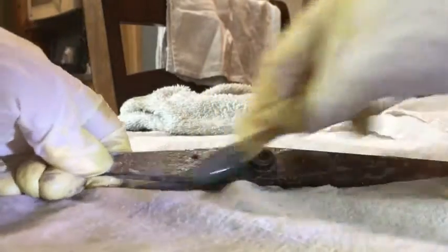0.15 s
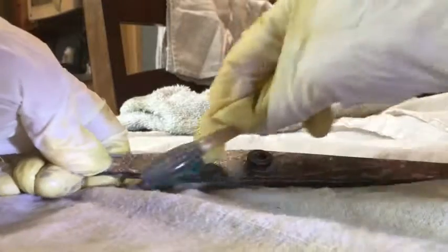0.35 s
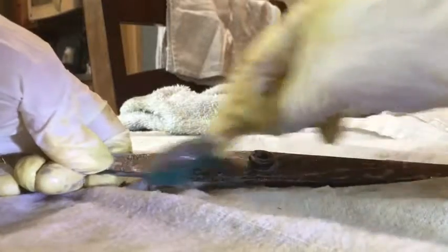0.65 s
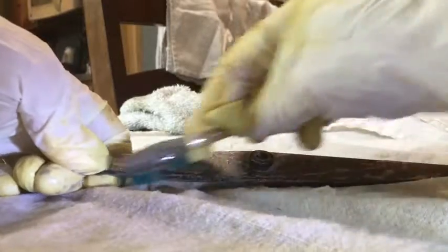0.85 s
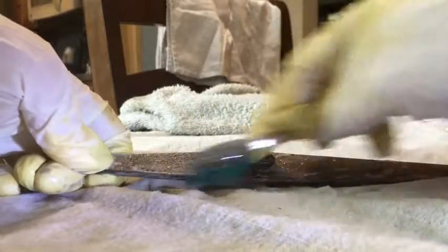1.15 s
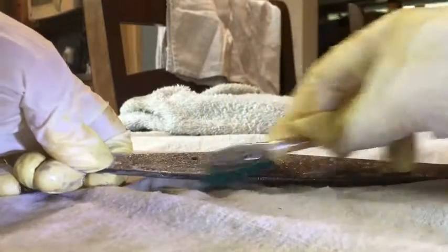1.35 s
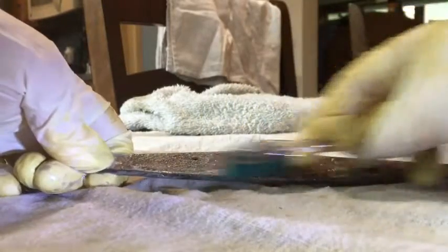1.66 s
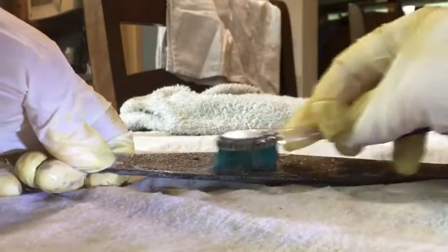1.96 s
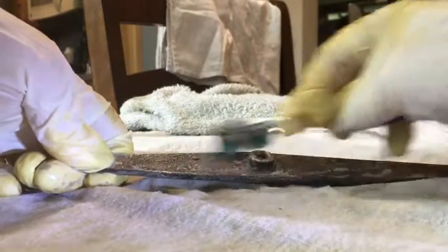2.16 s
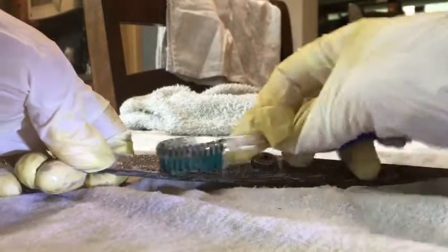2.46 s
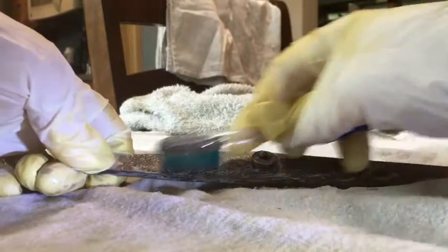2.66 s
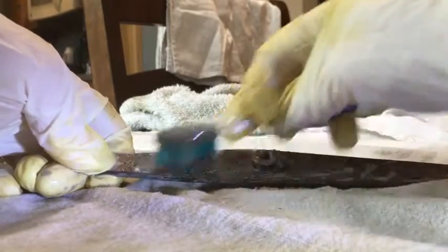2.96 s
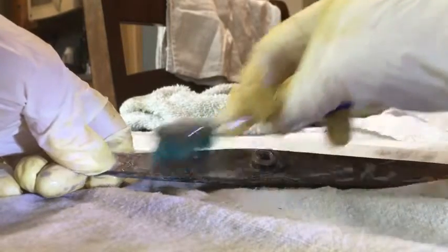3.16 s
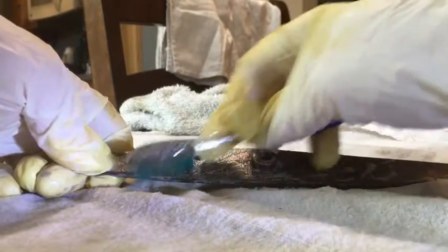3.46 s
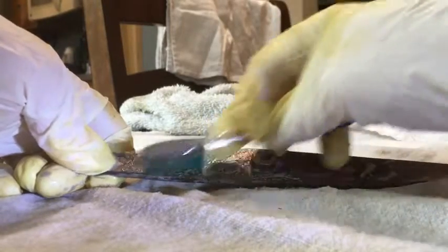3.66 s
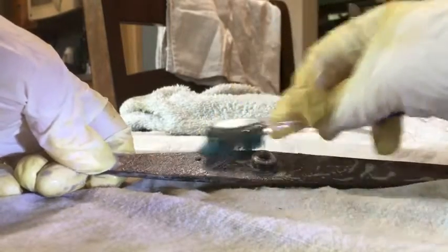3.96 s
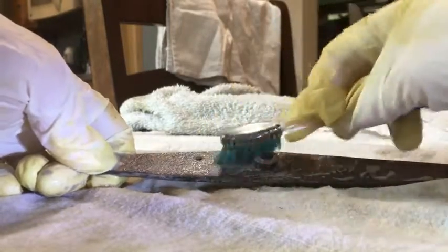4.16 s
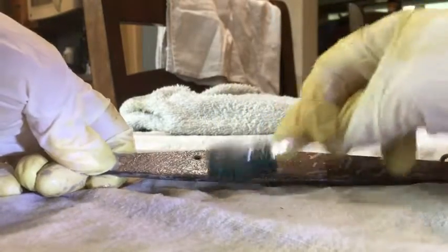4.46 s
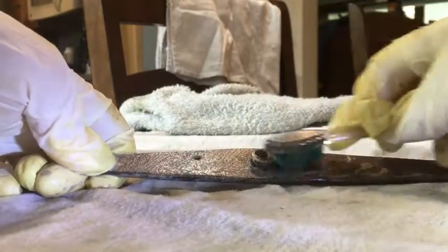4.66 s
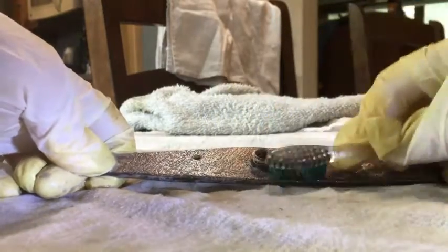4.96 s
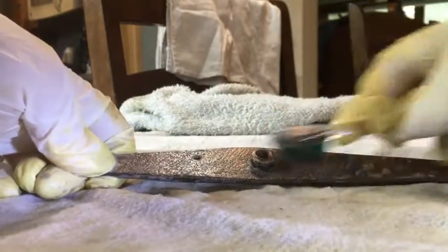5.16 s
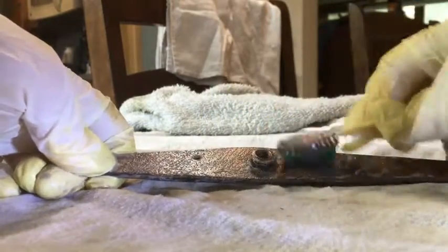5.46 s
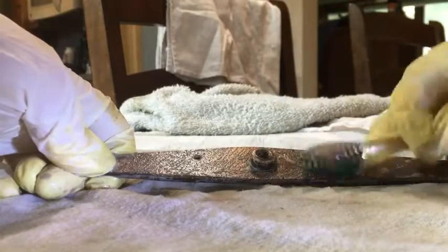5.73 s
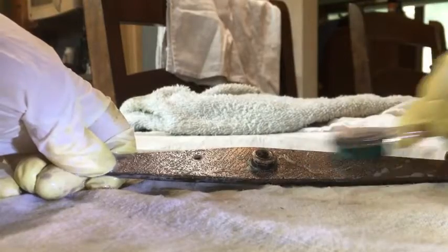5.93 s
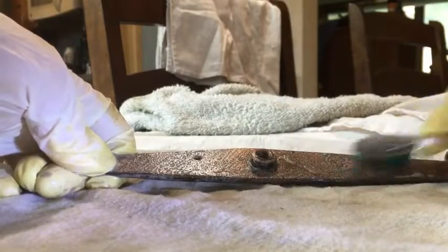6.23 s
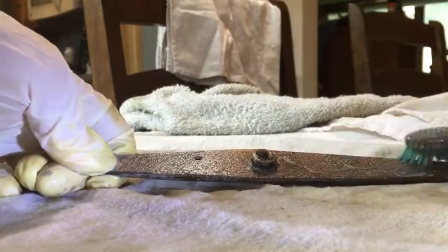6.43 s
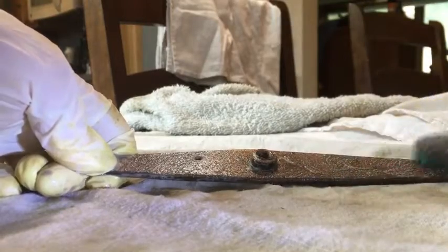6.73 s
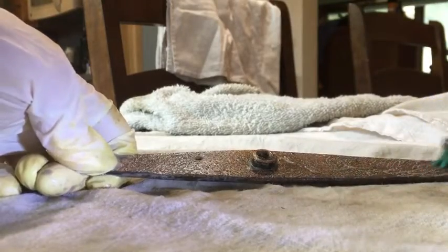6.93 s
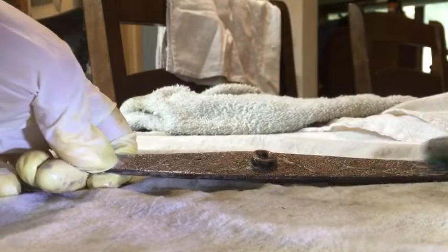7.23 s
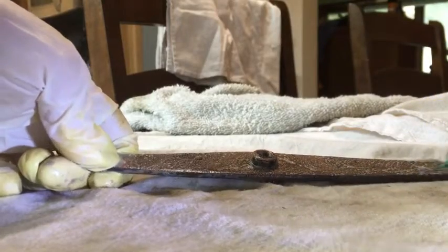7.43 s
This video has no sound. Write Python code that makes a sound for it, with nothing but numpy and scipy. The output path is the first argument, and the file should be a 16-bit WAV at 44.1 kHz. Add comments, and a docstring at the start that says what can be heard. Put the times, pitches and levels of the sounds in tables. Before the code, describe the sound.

A toothbrush scrubs a tarnished metal plate held on a towel, heard close up in mono. From the start, quick push and pull strokes, about eight a second, make a bright, grainy hiss that swells and dips with each turn. Light knocks of the plastic head and ticks of bristles come at about 0.4, 1.3 and 2.3 seconds, each with a very short, damped metallic ring. After a tiny break near 2.5 seconds, the strokes run faster, about ten a second, with small ticks around 2.9, 4.3 and 4.6 seconds. From about 4.6 seconds they become longer and more uneven, then slightly louder and fizzier from around 6 seconds. A sharp, high tick lands at 7.1 seconds, and thin, bright scrubbing continues to the end at about 7.6 seconds. Low ventilation rumble and hum stay underneath throughout.

```python
"""A room with ventilation humming behind; close to a mono microphone, a toothbrush scrubs a metal plate.
The plate is tarnished and held down on a towel. In each stroke the bristles speed up, flick over the
rough metal in thousands of tiny slips that merge into a bright hiss, and slow for the turn.
Now and then the plastic head knocks or flicking bristles tick on the plate, which rings briefly."""
import sys
import numpy as np
from scipy import signal
from scipy.fft import rfft, irfft
from scipy.io import wavfile
from scipy.ndimage import uniform_filter1d, map_coordinates

SR = 44100
rng = np.random.default_rng(int(sys.argv[2]) if len(sys.argv) > 2 else 0)


def file_out(sig):
    """Save sig as 16-bit WAV at sys.argv[1]."""
    # one column per channel
    cols = np.atleast_2d(sig).T
    # limit, then scale
    lim = np.clip(cols, -1, 1)
    pcm = np.round(lim * 32767).astype(np.int16)
    wavfile.write(sys.argv[1], SR, pcm)


N = 334710
TIME = np.arange(N) / SR

# fizz above about 10 kHz, rising as the brush works toward the far end: time_s, fizz_db
BRIGHTNESS = [(.15, 3), (.45, 1), (1.02, -0.5), (1.28, -1), (1.4, 4), (2.1, 3), (2.3, 5.5), (3.7, 5),
              (4.25, 0), (4.65, 6), (5.5, 2.5), (6, 6.5), (6.98, 9), (7.1, 15.5), (7.24, 4), (7.36, 13.5),
              (7.48, 4), (7.59, 16)]


def undb(db):
    """Decibels to gain."""
    return 10 ** (np.asarray(db) / 20)


def unit(x):
    """Scale to an rms of 1."""
    return x / np.sqrt(np.mean(x ** 2))


def curve(points, t):
    """Read an envelope of (time_s, value) points at the time t."""
    return np.interp(t, *np.transpose(points))


def gate(start_s, end_s, fade_s):
    """Open from start to end, with a linear fade centred on each."""
    return np.clip(np.minimum(TIME - start_s, end_s - TIME) / fade_s + .5, 0, 1)


def wander(rate_hz):
    """Smooth random modulation with an rms of 1."""
    hold = max(int(SR / rate_hz), 1)
    steps = np.repeat(rng.standard_normal(N // hold + 1), hold)[:N]
    return unit(uniform_filter1d(uniform_filter1d(steps, hold), hold))


def colour(x, points):
    """Equalise a sound along (frequency_hz, gain_db) points."""
    hz, db = np.transpose(points)
    bins = np.maximum(np.fft.rfftfreq(N, 1 / SR), 1)
    return irfft(rfft(x) * undb(np.interp(np.log(bins), np.log(hz), db)), N)


def resonate(x, hz, width_hz):
    """One resonance, gain 1 at its centre."""
    return signal.lfilter(*signal.iirpeak(hz, hz / width_hz, fs=SR), x)


def registers(x, body_hz=5000, edge_hz=10200):
    """Split a sound into body, middle and edge, which add up to the whole."""
    body = signal.sosfiltfilt(signal.butter(6, body_hz, fs=SR, output="sos"), x)
    below_edge = signal.sosfiltfilt(signal.butter(4, edge_hz, fs=SR, output="sos"), x)
    return body, below_edge - body, x - below_edge


def ventilation(rumble_db=-45, hum_trim_db=-1, waver_db=2):
    """Room tone: a low rumble of air under the wavering hum of motor and mains."""
    # spectrum of the rumble: frequency_hz, gain_db
    rumble_spectrum = [(22, -35), (31, -25), (40, -1), (52, -6), (68, -7.5), (105, -15.5), (135, -8.5),
                       (200, -15.5), (300, -19), (400, -23.5), (700, -31), (1200, -33.5), (3000, -49.5),
                       (15000, -73)]
    # motor and mains tones: pitch_hz, level_db
    hum_tones = [(41.5, -60), (119.8, -51), (221, -59), (237, -59.5)]
    rumble = unit(colour(rng.standard_normal(N), rumble_spectrum)) * undb(rumble_db)
    hum = np.zeros(N)
    for hz, db in hum_tones:
        amplitude = np.sqrt(2) * undb(db + hum_trim_db + waver_db * wander(4))
        hum += amplitude * np.sin(2 * np.pi * hz * TIME + .5 * wander(3.04))
    return rumble + hum


def knocks_and_ticks(ring_db=-3, edge_db=-4, low_cut_hz=640, attack_s=.005):
    """Knocks of the head and small ticks of flicking bristles; the harder, the more the plate rings."""
    # knocks and ticks on the plate: start_s, level_db, contact_hz, contact_width_hz, contact_db, t60_s
    impacts = [(0.378, -28.5, 8900, 2500, 10, .005), (1.3216, -26, 3500, 2000, -1.5, .022),
               (2.1243, -32.5, 8000, 3000, 4, .009), (2.3157, -24.5, 880, 500, -12, 0.017),
               (2.367, -38, 9080, 3500, 1, .005), (2.3942, -40, 9800, 3500, 5, .004),
               (2.857, -32.5, 9800, 3500, 6.5, .011), (3.91, -47, 2950, 900, 10, .008),
               (4.3335, -32.5, 8200, 3500, 3, 0.011), (4.594, -32, 11300, 2000, 9, 0.014),
               (5.151, -39, 4770, 3000, -6, 0.013), (7.1001, -19.5, 11700, 400, 6, 0.023),
               (7.112, -30.5, 13200, 3000, 13, .004), (7.1172, -31.5, 13000, 3000, 20, .005),
               (7.346, -32, 1790, 3400, 3.5, 0.02)]
    # modes of the plate, damped by hand and towel: pitch_hz, level_db, t60_s
    plate_modes = [(790, -1, 0.026), (1135, -14, 0.1), (2185, 4, 0.048), (4800, -18, .024),
                   (6440, 20, 0.021), (8540, 8, 0.036), (9660, 3, .028), (12100, -3, .03)]
    out = np.zeros(N + SR)
    t = np.arange(SR // 8) / SR
    low_cut = signal.butter(4, low_cut_hz, "high", fs=SR, output="sos")
    hardest_db = max(row[1] for row in impacts)
    for start, db, hz, width_hz, contact_db, t60 in impacts:
        burst = signal.sosfilt(low_cut, rng.standard_normal(len(t)) * undb(-60 * t / t60))
        contact = resonate(resonate(burst, hz, width_hz), hz, width_hz)  # colour of the point of contact
        ring = sum(undb(mode_db - 60 * t / mode_t60) * np.sin(2 * np.pi * (mode_hz * t + rng.random()))
                   for mode_hz, mode_db, mode_t60 in plate_modes)
        ring_gain = undb(ring_db + (db - hardest_db) / 2)
        body, middle, edge = registers(unit(burst) + ring_gain * unit(ring))
        edge_gain = undb(edge_db + curve(BRIGHTNESS, start))
        impact = body + middle + edge_gain * edge + undb(contact_db) * unit(contact)
        attack_rms = np.sqrt(np.mean(impact[t < attack_s] ** 2))
        out[int(start * SR):][:len(t)] += impact / attack_rms * undb(db)
    return out[:N]


def plate_spots(friction, fade_s=.037):
    """Each resonance swells while the brush works over its stretch of the plate."""
    # resonances the brush wakes: start_s, end_s, centre_hz, width_hz, level_db
    spots = [(0, 1.9, 4100, 1000, -20), (0.448, 1.3, 9600, 1400, -11), (0.598, 2.45, 3020, 555.6, -20),
             (0.3, 2.9, 730, 200, -31), (3.64, 3.92, 570, 400, -18), (4.4, 6.6, 4070, 1080, -24),
             (4.502, 6.6, 11100, 1400, -13), (6.75, 7.8, 1115, 219.8, -27)]
    out = np.zeros(N)
    for start, end, hz, width_hz, db in spots:
        band = resonate(resonate(friction, hz, width_hz), hz, width_hz)
        out += unit(band) * gate(start, end, fade_s) * undb(db)
    return out


def edge_reflections(x, lag_s=.0007, drift=.182, strength=.19, count=4):
    """Waves return from the plate's edges; their paths change as the brush travels, so they shimmer."""
    out = x
    for k in range(count):
        lag = lag_s * (1 + k * k / 2) * (1 + drift * wander(5) / (1 + k)) * SR
        out = out + strength * rng.choice([-1, 1]) * map_coordinates(x, [np.arange(N) - lag], order=3)
    return out


def bristle_slips(per_second, spread_db=2.5):
    """Bristles let go in tiny random clicks of constant mean power; a few are far larger than the rest."""
    happens = rng.random(N) < per_second / SR
    size = undb(spread_db * np.minimum(rng.exponential(size=N), 2 * np.pi))
    return unit(happens * size * rng.choice([-1, 1], N) / np.sqrt(per_second))


def hand_motion(sharpness=1.52, pull_fizz_db=.5, lift_s=(2.445, 2.516), lift_db=-15):
    """Level, swell and fizz of the scrubbing: every stroke is an arch over the drag of the bristles."""
    # strokes, push and pull in turn: start_s, speed_up_s, slow_down_s, peak_db
    strokes = [(-0.047, 0.084, 0.075, -32), (0.134, 0.028, 0.07, -37.5), (0.207, 0.084, 0.048, -31.5),
               (0.341, 0.051, 0.083, -31.5), (0.509, 0.028, 0.046, -35), (0.589, 0.045, 0.073, -32.5),
               (0.731, 0.036, 0.069, -32.0), (0.842, 0.049, 0.066, -34), (0.977, 0.054, 0.074, -31.5),
               (1.096, 0.073, 0.062, -37.5), (1.227, 0.067, 0.065, -33), (1.334, 0.077, 0.034, -38.0),
               (1.458, 0.076, 0.059, -31), (1.588, 0.084, 0.053, -32), (1.747, 0.052, 0.064, -33.0),
               (1.848, 0.061, 0.072, -35.0), (1.974, 0.069, 0.041, -36.0), (2.08, 0.06, 0.055, -34.0),
               (2.224, 0.051, 0.088, -34.5), (2.321, 0.057, 0.026, -40.5), (2.516, 0.026, 0.05, -33),
               (2.603, 0.06, 0.038, -32.5), (2.731, 0.034, 0.049, -32), (2.839, 0.031, 0.049, -33.5),
               (2.941, 0.028, 0.058, -31), (3.036, 0.048, 0.038, -34.5), (3.132, 0.05, 0.045, -34),
               (3.244, 0.031, 0.04, -31), (3.339, 0.045, 0.036, -31.5), (3.433, 0.036, 0.047, -32.5),
               (3.534, 0.036, 0.048, -34.5), (3.632, 0.031, 0.059, -33), (3.737, 0.031, 0.047, -32),
               (3.832, 0.043, 0.034, -34.5), (3.924, 0.045, 0.029, -34.5), (4.006, 0.05, 0.052, -33.0),
               (4.114, 0.048, 0.034, -33), (4.201, 0.057, 0.051, -33.5), (4.309, 0.049, 0.056, -37.0),
               (4.391, 0.063, 0.045, -37.5), (4.544, 0.082, 0.068, -38.5), (4.61, 0.1, 0.045, -30),
               (4.721, 0.052, 0.055, -39), (4.806, 0.15, 0.047, -35.5), (4.975, 0.083, 0.041, -34),
               (5.095, 0.088, 0.082, -33.0), (5.231, 0.065, 0.028, -33.5), (5.325, 0.066, 0.14, -35),
               (5.489, 0.068, 0.061, -41.5), (5.578, 0.1, 0.065, -30), (5.711, 0.12, 0.051, -33),
               (5.858, 0.098, 0.07, -28), (5.999, 0.083, 0.074, -33.5), (6.118, 0.12, 0.066, -28.5),
               (6.276, 0.09, 0.039, -34.5), (6.391, 0.092, 0.094, -29.5), (6.538, 0.11, 0.037, -35.5),
               (6.668, 0.087, 0.06, -29.5), (6.773, 0.12, 0.033, -38), (6.926, 0.062, 0.063, -29),
               (7.007, 0.12, 0.062, -34.5), (7.173, 0.069, 0.072, -33.0), (7.296, 0.08, 0.046, -31.5),
               (7.417, 0.085, 0.037, -30.5), (7.545, 0.053, 0.054, -34)]
    # bristles that stay down and drag through the turns: time_s, level_db
    drag = [(0.0, -42.5), (0.22, -40), (0.5, -52), (1.0, -56.5), (1.35, -55), (1.46, -53.5), (1.86, -51),
            (2.2, -54), (2.7, -47.5), (2.93, -52), (3.05, -48), (3.9, -55.5), (4.5, -44.5), (4.83, -60),
            (5.5, -44), (6.15, -49), (6.4, -56), (7.59, -43)]
    power = undb(curve(drag, TIME)) ** 2
    swell, pull = np.zeros(N), np.zeros(N)
    for k, (start, rise, fall, db) in enumerate(strokes):
        span = slice(*np.searchsorted(TIME, [start, start + rise + fall]))
        speed = np.interp(TIME[span] - start, [0, rise, rise + fall], [0, 1, 0])
        arch = np.sin(speed * np.pi / 2) ** sharpness
        power[span] += (undb(db) * arch) ** 2
        swell[span] = np.maximum(swell[span], arch)
        pull[span] += arch if k % 2 else -arch  # a pull is brighter, a push duller
    lifted = gate(*lift_s, fade_s=.01)  # the brush leaves the plate once
    level_db = 10 * np.log10(power) + lift_db * lifted
    fizz_db = curve(BRIGHTNESS, TIME) + pull_fizz_db * pull
    return level_db, swell, fizz_db


def scrubbing(slow_slips_per_s=4500, fast_slips_per_s=17000, tuft_db=1.13, catch_db=.94, flutter_db=.77,
              rasp_db=-15.1, middle_db=.9, edge_db=.7, firm_stroke_db=-33.5, bite_db=1.0):
    """Faster bristles slip more densely; whole tufts catch and let go, which roughens the hiss."""
    # spectrum of one bristle slip: frequency_hz, gain_db
    slip_spectrum = [(350, -18.5), (600, -14), (730, -11), (860, -21.5), (1360, -11.5), (1750, -14),
                     (2500, -9.5), (3650, -12.5), (4300, -10.5), (4900, -9.5), (6200, -0.5), (9300, -2),
                     (12000, -2.3), (14500, -3.6), (15800, -5.2)]
    level_db, swell, fizz_db = hand_motion()
    slip_rate = slow_slips_per_s + (fast_slips_per_s - slow_slips_per_s) * swell
    tufts = undb(tuft_db * wander(420) + catch_db * wander(70))
    friction = unit(edge_reflections(bristle_slips(slip_rate) * tufts))
    bands = registers(colour(friction, slip_spectrum))
    # each register also flutters by itself as different tufts take the load
    body, middle, edge = (unit(band * undb(flutter_db * wander(45))) for band in bands)
    hiss = undb(middle_db) * middle + undb(edge_db + fizz_db) * edge
    hiss /= np.sqrt(1 + undb(2 * fizz_db))  # fizz tilts the hiss without making it louder
    # slow, light bristles sound duller, most of all as they bite at half speed
    dull_db = .24 * (firm_stroke_db - level_db) - .35 * fizz_db + bite_db * np.sin(np.pi * swell)
    rasp = body * undb(rasp_db + dull_db)
    resonances = plate_spots(bristle_slips(slip_rate) * tufts)
    return (hiss + rasp + resonances) * undb(level_db)


def scene():
    """Brush, plate and room reach one microphone, the same in both channels."""
    mono = scrubbing() + knocks_and_ticks() + ventilation()
    return np.array([mono, mono])


def record(dry, notch_hz=10430, notch_width_hz=550, notch_depth=.54, top_hz=15900):
    """The microphone port has a narrow dip in the treble; a steep low-pass cuts the top."""
    notched = dry - notch_depth * resonate(dry, notch_hz, notch_width_hz)
    return signal.sosfilt(signal.ellip(12, .2, 75, top_hz, fs=SR, output="sos"), notched)


dry = scene()
out = record(dry)
file_out(out)
```